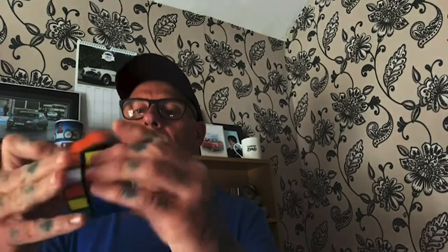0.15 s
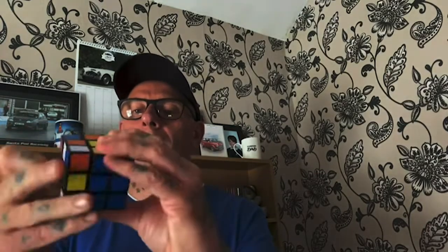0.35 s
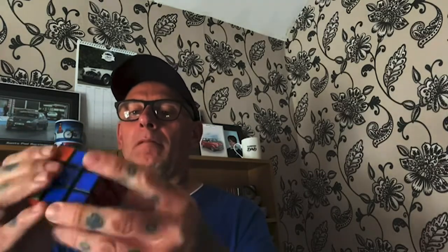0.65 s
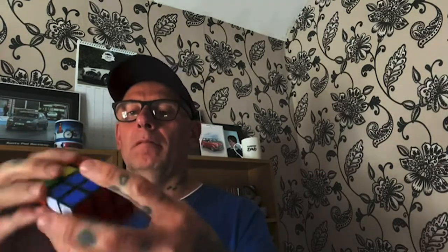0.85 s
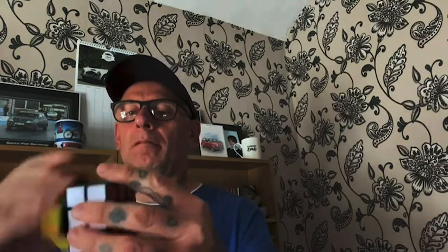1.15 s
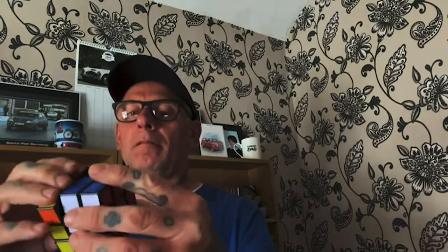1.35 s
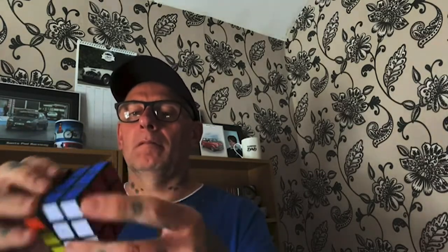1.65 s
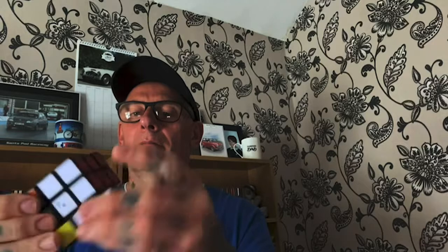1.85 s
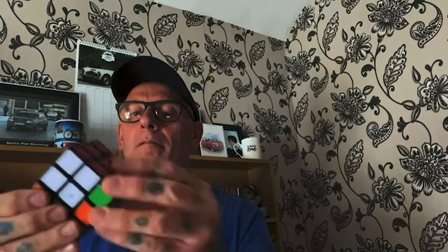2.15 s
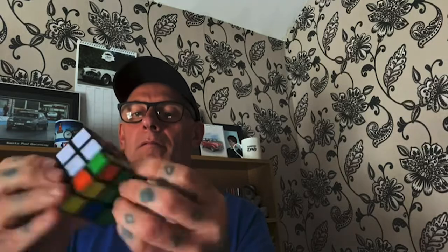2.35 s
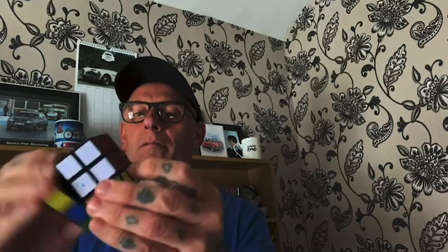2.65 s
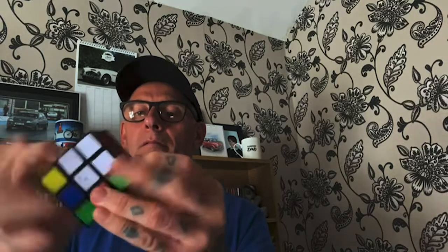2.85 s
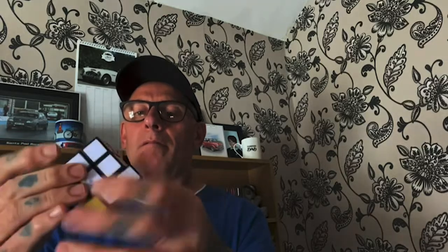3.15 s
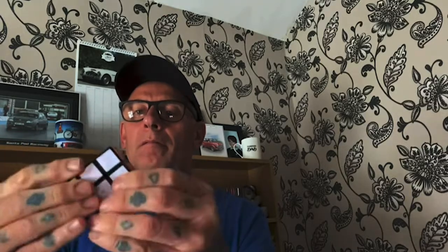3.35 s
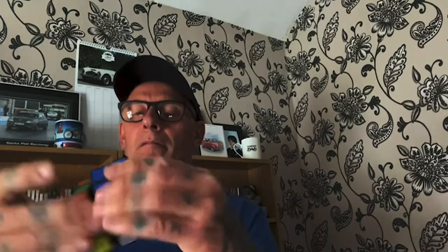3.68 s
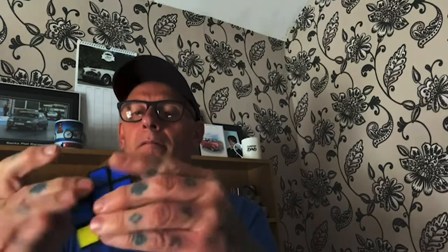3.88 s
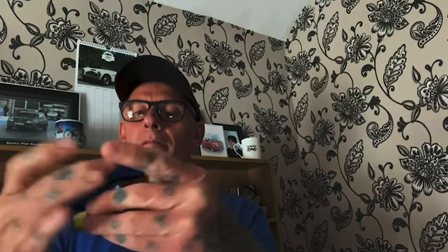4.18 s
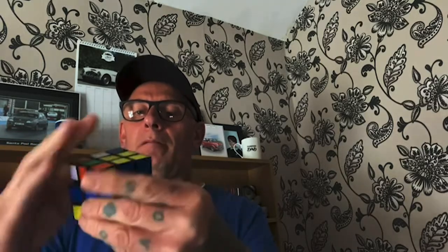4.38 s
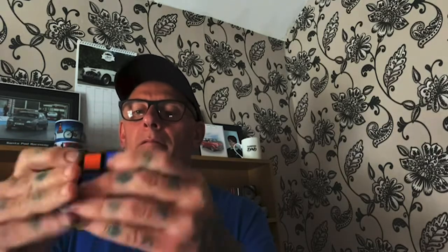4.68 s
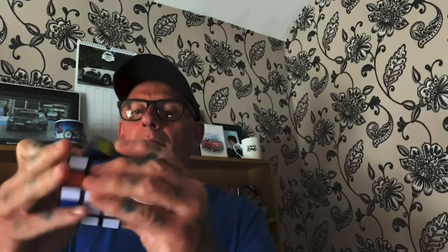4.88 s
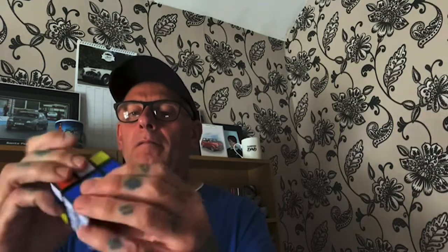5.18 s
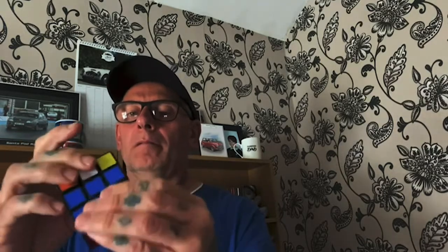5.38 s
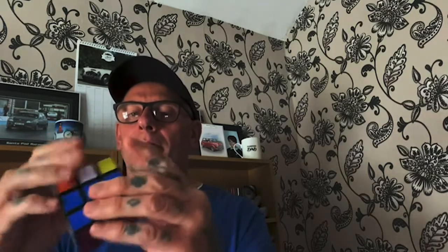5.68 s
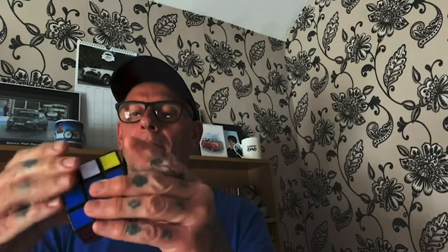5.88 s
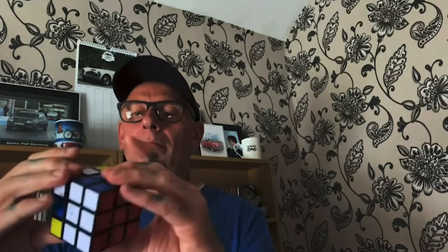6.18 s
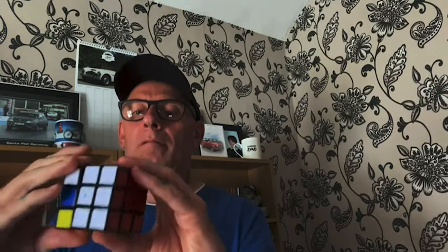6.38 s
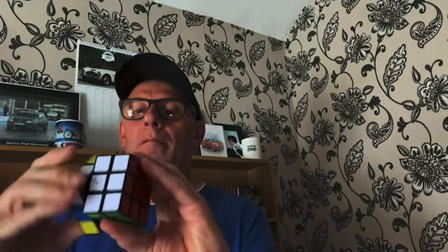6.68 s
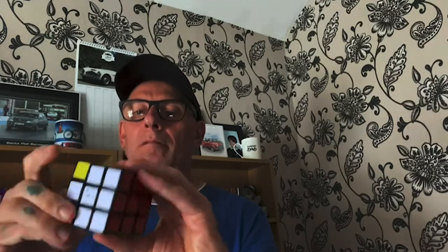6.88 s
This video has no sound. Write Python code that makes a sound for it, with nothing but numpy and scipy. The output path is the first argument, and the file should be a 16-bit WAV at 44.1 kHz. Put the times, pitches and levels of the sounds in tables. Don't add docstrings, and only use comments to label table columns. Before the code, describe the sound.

A hollow plastic puzzle cube is twisted rapidly by hand up close, clattering and clicking in a quiet small room, with late dull thuds.

```python
import sys
import numpy as np
from scipy import signal
from scipy.fft import rfft, irfft, next_fast_len
from scipy.io import wavfile
from scipy.ndimage import uniform_filter1d

SR = 44100
rng = np.random.default_rng(int(sys.argv[2]) if len(sys.argv) > 2 else 0)


def generate_wav(signal):
    frames = np.transpose(np.atleast_2d(signal))
    scaled = np.clip(frames, -1, 1) * 32767
    pcm = np.round(scaled).astype(np.int16)
    wavfile.write(sys.argv[1], SR, pcm)


def gain_from_decibels(decibels):
    exponent = np.asarray(decibels, float) / 20
    return 10 ** exponent


N = 310023
SIZE = next_fast_len(N + SR, True)
HZ = np.fft.rfftfreq(SIZE, 1 / SR)
T_S = np.arange(N) / SR
MID_SIDE = np.array([[1], [-1]])

# start_s, length_s, chatter_db, swish_db (faces rubbing)
TURNS = [(-.06, 0.15, -48, -66.5), (0.033, 0.18, -48.5, -64.5), (0.322, 0.2, -44, -76),
         (0.483, 0.216, -49.5, -80.5), (0.756, 0.225, -52.5, -100), (1.015, 0.248, -43, -64.5),
         (1.194, 0.34, -61.5, -97.5), (1.453, 0.143, -55, -91.5), (1.639, 0.21, -48.5, -64),
         (1.766, 0.28, -46, -65), (2.067, 0.11, -41.5, -71.5), (2.141, 0.33, -60, -70.5),
         (2.365, 0.31, -66, -69.5), (2.523, 0.21, -47.5, -63.5), (2.706, 0.15, -49, -71.5),
         (2.849, 0.26, -50, -63), (3.144, 0.103, -58, -75), (3.33, 0.09, -53.5, -106),
         (3.502, 0.35, -55, -70), (3.877, 0.1, -60, -69), (4.043, 0.25, -56.5, -69),
         (4.337, 0.21, -48.5, -64.5), (4.444, 0.26, -54.5, -66), (4.662, 0.16, -47, -62.5),
         (4.781, 0.22, -48, -68.5), (4.936, 0.31, -54, -77), (5.511, 0.14, -61, -73),
         (6.403, 0.13, -60, -68), (6.499, 0.3, -51.5, -64), (6.941, 0.14, -50.5, -80)]
TURN_PEAK_SHARE = 0.4


def rms_one(x):
    return x / np.sqrt(np.mean(x ** 2) + 1e-20)


def at_hz(points):
    hz, value = np.transpose(points)
    return np.interp(np.log(HZ + 1), np.log(hz), value)


def band(x, low_hz, high_hz):
    return signal.sosfilt(signal.butter(2, [low_hz, high_hz], "band", fs=SR, output="sos"), x)


def resonance(hz, width_hz):
    return 1 / (1 + 1j * (HZ ** 2 - hz ** 2) / (width_hz * HZ + 1e-9))


def at_ports(draws):
    # hz, left_right_likeness (0-1)
    likeness = [(40, .95), (300, .55), (1200, .87), (4000, .8), (6200, .25), (7500, .97), (9000, .88),
                (9900, .99), (11300, .97), (13500, .96), (15000, .93)]
    alike = np.clip(at_hz(likeness), 0, 1)
    common = np.sqrt(0.5 + alike / 2) * draws[0]
    differing = np.sqrt(0.5 - alike / 2) * draws[1]
    return irfft(common + differing * MID_SIDE, SIZE)[:, :N]


def air():
    # hz, density_db (per Hz)
    hiss_spectrum = [(90, 1), (145, -6.5), (215, -4.5), (584, -15), (1320, -22.5), (2500, -25), (5590, -29),
                     (10000, -32.5), (13500, -33.5), (14500, -58)]
    noise = rfft(rng.standard_normal((2, SIZE))) * gain_from_decibels(at_hz(hiss_spectrum)) * (HZ > 85)
    return gain_from_decibels(-77) * rms_one(at_ports(noise))


def rumble():
    # centre_s, spread_s, level_db
    swells = [
        (1.27, 0.04, -67),
        (2.167, 0.051, -76),
        (3.602, 0.02, -65.5),
        (4.19, 0.038, -55),
        (5.199, 0.1, -54),
        (5.7, 0.051, -64),
        (5.87, 0.069, -65.5),
        (6.77, 0.098, -63),
    ]
    mid, side = band(rng.standard_normal((2, N)), 44, 61)
    level = gain_from_decibels(-77)
    for centre_s, spread_s, level_db in swells:
        level = level + gain_from_decibels(level_db) * np.exp(-0.5 * ((T_S - centre_s) / spread_s) ** 2)
    return level * rms_one(mid + 0.18 * side * MID_SIDE)


def thuds():
    # start_s, level_db, centre_hz, t60_s
    hard = [
        (5.687, -42, 202, 0.11),
        (5.735, -57, 236.2, 0.37),
        (6.675, -34, 136, 0.13),
        (6.706, -41.5, 134.5, 0.24),
    ]
    # start_s, level_db, centre_hz, t60_s
    soft = [
        (.385, -65, 105, .2),
        (1.01, -68, 105, .2),
        (2.1, -66, 300, .35),
        (2.85, -63, 170, .15),
        (3.62, -64, 260, .2),
        (4.31, -64, 300, .2),
        (4.95, -64.5, 300, .45),
        (6.35, -68, 520, .3),
    ]
    out = np.zeros((2, N))
    white = rng.standard_normal((2, N)) * [[1], [0.2]]
    for start_s, level_db, hz, t60_s in hard + soft:
        age_s = np.maximum(T_S - start_s, 0)
        for ratio, part_db in [(0.45, 4.5), (1, 4.5), (2.2, -22.5)]:
            mid, side = band(white, 0.77 * ratio * hz, 1.37 * ratio * hz)
            rise = 1 - np.exp(-age_s * ratio / 0.013)
            fall = gain_from_decibels(level_db + part_db - 60 * age_s * ratio ** 0.038 / t60_s)
            out += rise * fall * (mid + side * MID_SIDE) / mid.std()
    for start_s, level_db, hz, t60_s in hard:
        age_s = np.maximum(T_S - start_s, 0)
        rise = 1 - np.exp(-age_s / 0.0041)
        fall = gain_from_decibels(level_db + 4 - 60 * age_s / (0.85 * t60_s))
        out += rise * fall * np.sin(2 * np.pi * hz * age_s)
    return out


def room():
    room_t60_s, treble_t60_s, room_db = 0.14, 0.1, -10.5
    t_s = np.arange(SR // 2) / SR
    white = rng.standard_normal((2, len(t_s))) * (1 - np.exp(-(t_s / 0.0027) ** 2))
    low = signal.lfilter([0.35], [1, -0.65], white)
    tail = low * gain_from_decibels(-60 * t_s / room_t60_s) + (white - low) * gain_from_decibels(-60 * t_s / treble_t60_s)
    return gain_from_decibels(room_db) * rfft(rms_one(tail) / np.sqrt(len(t_s)), SIZE)


def grit(per_s, uneven_db):
    size = gain_from_decibels(uneven_db * np.minimum(rng.exponential(1, N), 3.2)) * (rng.random(N) < per_s / SR)
    return rms_one(size * rng.standard_normal((2, N)))


def turn_speed(start_s, length_s):
    done = np.clip((np.arange(0, N, 44) / SR - start_s[:, None]) / length_s[:, None], 0, 1)
    return np.sin(np.pi * done ** (np.log(0.5) / np.log(TURN_PEAK_SHARE))).clip(0)


def sliding():
    start_s, length_s, chatter_db, swish_db = np.transpose(TURNS)
    speed = turn_speed(start_s, length_s)
    chatter = gain_from_decibels(-83) + gain_from_decibels(chatter_db) @ speed ** 4.2
    swish = gain_from_decibels(-95.5) + gain_from_decibels(swish_db) @ speed ** 4.1
    return [np.interp(np.arange(N), np.arange(0, N, 44), gain) for gain in (chatter, swish)]


def contact_times():
    # start_s, peak_db, hollow_db (rel), edge_db (rel)
    snaps = [(0.0026, -46, 0.5, -7.5), (0.1201, -34.5, 5.5, -1.5), (0.1256, -44, 1, -9),
             (0.1406, -42.5, 16, -8), (0.1473, -36, -4, -1.5), (0.1807, -41, 5, 10), (0.1965, -59, 18, -4),
             (0.3469, -34.5, 0, -12), (0.4125, -41.5, 0, 0.5), (0.4174, -42.5, 5, -9.5),
             (0.5778, -31.5, -4.5, -1.5), (0.6008, -49, 1, 3.5), (0.843, -34, -10, -6.5),
             (0.9981, -36.5, -2.5, -0.5), (1.0884, -44.5, 5, -9.5), (1.1094, -29.5, 4.5, -3),
             (1.1308, -44, 7, -2), (1.1398, -48.5, -4, -4), (1.7005, -41.5, 9.5, 2),
             (1.8168, -44.5, -6, 2.5), (1.8804, -43, -3, -8), (1.8856, -41.5, -7, 0.5),
             (2.2495, -60, -7, 1), (2.2707, -45.5, 7.5, -6), (2.2805, -34, 3.5, -6),
             (2.3498, -24, 1.5, 3.5), (2.354, -34, 0.5, -3.5), (2.3772, -52, -3, -4.5),
             (2.596, -41, 4, -0.5), (2.6072, -44, -16, -4), (2.7753, -36, -11, -7),
             (2.8464, -28, -8.5, -5.5), (2.9252, -26.5, -7, -1.5), (3.1759, -64.0, -1, 11),
             (3.6563, -38, 4, -2), (3.6686, -27, -3, -10), (4.151, -53, 7.5, -12.5),
             (4.3977, -33, -4.5, -1.5), (4.4044, -41.5, -13, 0), (4.4214, -41, -3, -5.5),
             (4.6768, -36.0, 2, -4.5), (4.6825, -50, -6, -1), (4.8516, -53, 18, 7.5),
             (5.0292, -40.5, -9.5, -5.5), (5.3313, -40, -14.5, -7), (5.5276, -43.5, 6.5, 12.5),
             (5.5321, -34, 0.5, -3.5), (6.4308, -45.5, -6, 1), (6.4363, -56, -4.5, 4),
             (6.977, -36, 5, -0.5)]
    # start_s, peak_db, hollow_db (rel), edge_db (rel)
    clacks = [(0.0176, -53.5, 8.5, -17), (0.0675, -30.5, -9, -12), (0.1069, -37.5, 11, 1),
              (0.1106, -23, -16, -5), (0.1366, -38, 8, -9), (0.3788, -26.5, -5.5, -11.5),
              (0.6577, -38.0, -2.5, -8), (0.8223, -46, 0, -18.5), (0.8717, -45, -3.5, -7),
              (0.8884, -38.5, -7, -12), (1.0081, -38.5, 2.5, -2), (1.0949, -32, -3, -10.5),
              (1.1196, -28, -5, -15), (1.2875, -43.5, 2.5, -5.5), (1.7133, -34.5, 2.5, -6.5),
              (1.7235, -41.5, 11.5, -2), (1.8465, -44.5, -20, -4), (2.0931, -45, 8, -6),
              (2.1123, -52, 8, -16.5), (2.2428, -42, 2.5, -2), (2.2909, -38.5, -8, -18),
              (2.4573, -30.5, 0.5, -7), (2.8143, -45.5, 0, -10.5), (2.8534, -46, 4, -7.5),
              (2.8903, -36.5, 1, -9.5), (2.9325, -26, 2.5, -11.5), (2.9395, -35.5, 0, -10),
              (2.9522, -61, -1, -11.5), (2.9682, -27.5, 0.5, -7), (2.9761, -43, 12.5, -1),
              (2.9926, -43.5, -16, -12), (3.6648, -36, 6.5, 0.5), (4.1627, -54.5, 15.5, -2.5),
              (4.1687, -54, 10.5, -7.5), (4.3804, -32.5, 0, -6.5), (4.5196, -45.5, 0.5, -17),
              (4.5625, -42.5, 5, -12.5), (4.586, -79, 32, -14.5), (4.5915, -38, 5, -4),
              (4.6628, -51.5, 4.5, -15), (4.7084, -30.5, 4, -10), (4.7139, -43.5, -11, -11),
              (4.7471, -48.5, 8, -9.5), (4.9918, -43, -7.5, -14.5), (5.1295, -46, -1.5, -7),
              (6.5455, -50.5, 8.5, -1.5), (6.571, -46, 1, -8), (6.5887, -37.5, 7, -19),
              (6.6398, -55, 15.5, -10)]
    # start_s, peak_db, hollow_db (rel), edge_db (rel)
    knocks = [(0.2663, -44, 10.5, -14), (0.279, -37, 2, -18.5), (0.3192, -34.5, -4.5, -25.5),
              (0.5332, -36, -1.5, -11), (0.5826, -32, -4.5, -28), (0.8305, -42.5, -9, -26),
              (1.0745, -52, 4, -21.5), (1.0787, -52.5, 13.5, -20.5), (1.1543, -53.5, -13, -12),
              (1.4935, -42, -0.5, -18), (1.5157, -40, -11, -14), (1.8504, -33.5, 2, -23),
              (1.8704, -32.5, -12, -10.5), (1.8741, -42, 13.5, -19), (2.0545, -47, 4, -28),
              (2.1258, -45, 6.5, -10.5), (2.1483, -38.5, -4.5, -18.5), (2.2308, -54.5, 14.5, -6),
              (2.7464, -48.5, 2, -19.5), (2.7681, -39, -23, -14.5), (2.8075, -35.5, -12, -23),
              (2.8185, -52, 9, -19), (2.8606, -31.5, -1, -16.5), (2.8796, -34.5, -15, -8.5),
              (2.9016, -40.5, -6, -26.5), (3.1869, -46.5, -2, -14), (3.4887, -39, 3, -21),
              (3.579, -45, 1.5, -25.5), (3.6496, -35.5, 4, -14), (3.7194, -41, 1.5, -10),
              (4.023, -40.5, 2.5, -45), (4.1283, -48.5, 9, -23.5), (4.134, -54, 0, -17.0),
              (4.1555, -48.5, 9.5, -21.5), (4.5748, -42, 8.5, -18), (4.5812, -33, -1.5, -29.5),
              (4.6436, -40.5, -9, -14), (4.7202, -50, 15.5, -13), (4.7518, -46.5, 4, -8.5),
              (4.8357, -41, -5.5, -10.5), (4.8466, -41, 2, -23.5), (4.9018, -46, 7, -20.5),
              (5.025, -53, 16, -19), (5.1043, -54, 15, -13), (5.5453, -45, -1, -19),
              (6.6231, -38.5, -7, -11.5), (6.6283, -40, 5.5, -15.5)]
    # start_s, peak_db, hollow_db (rel)
    ticks = [(0.2331, -53, 3), (0.5122, -58.5, 2), (0.8627, -71, 15), (1.2473, -60.5, 7), (1.4573, -66, 5),
             (1.5683, -67, 9.5), (1.6661, -59.5, 7), (1.7968, -63.5, 14.5), (1.8238, -50.5, 14),
             (1.9627, -53.5, -13), (1.9684, -58, -13), (2.0031, -52.0, 4), (2.4179, -60, 12),
             (2.5336, -56, -8), (2.5775, -51, -15), (2.9998, -52.5, -6), (3.0046, -51, -22),
             (3.0315, -64, 12.5), (3.5129, -71, 12), (3.5239, -62.5, -1), (3.8926, -50.5, -3),
             (3.9227, -67, 10), (4.1006, -72, 13), (4.5361, -54.5, 9), (4.8676, -58, -5), (4.8788, -68, 11),
             (4.9287, -63.5, 9), (5.0454, -72, 27), (5.142, -59.5, 9), (5.246, -66, -3.5),
             (5.3378, -68.5, 22), (5.4468, -56.5, 0), (5.5655, -58.5, -15), (5.8451, -83.5, 23),
             (6.2467, -77.5, 20.5), (6.6904, -49, 2), (6.9252, -65, -11.5)]
    # start_s, peak_db, hollow_db (rel)
    nudges = [(0.0346, -43, -4.5), (0.285, -50.5, 3), (0.6374, -58, 10), (0.6639, -66, 17),
              (0.6804, -59, 5), (0.708, -68.5, 9), (0.7547, -79.5, 21), (0.8981, -50.5, -4),
              (0.9872, -60.5, 2), (1.3618, -45.5, -2), (1.4528, -81.5, 26), (1.6965, -43.5, -5),
              (1.7035, -42.5, -2), (1.7484, -58, 3.0), (1.7534, -46, 4), (1.7604, -50, -10),
              (1.9253, -58, 4.5), (2.0365, -53.5, 3.5), (2.1425, -51, -10), (2.3445, -49.5, -2),
              (2.4117, -52.5, -4), (2.5708, -58, 2.5), (2.6431, -54, -2), (2.9165, -44.5, 2.5),
              (2.9217, -34, -1.5), (3.3655, -52.5, 6.5), (3.6311, -50, 2), (3.8459, -60.5, 3),
              (3.8828, -68.5, 13.5), (3.9135, -51.5, -0.5), (4.046, -62.5, 7), (4.2959, -78, 24.5),
              (4.4535, -51, 3), (4.462, -58.5, 6.5), (4.5289, -51.5, -4), (4.6346, -47, 2.5),
              (4.7678, -51.5, 4), (4.8249, -61.5, 16.5), (4.8945, -47.5, 5), (5.0774, -64, -3),
              (5.3253, -59.5, 13.5), (5.3687, -64, 2), (5.4311, -56.5, 7), (5.4348, -53.5, -1),
              (5.5929, -52.5, 1.5), (5.9835, -79, 25.5), (6.0299, -49.5, -3), (6.1295, -74.5, 15.5),
              (6.2694, -79.5, 14.5), (6.9316, -69, 16.5), (6.996, -53.5, 19.5)]
    # start_s, peak_db, hollow_db (rel)
    taps = [(0.2578, -45.5, -5), (0.5574, -59, -2), (0.7714, -63, 9), (0.7953, -59, 8.5), (0.8041, -67, 14),
            (0.8387, -49, -10), (1.2189, -56, -1), (1.2301, -49.5, 1), (1.2436, -52.5, 2),
            (1.5736, -59, 2.5), (1.9345, -46, 2.5), (2.0408, -47.5, 5.5), (2.1842, -55, -6),
            (2.2762, -53.5, -14), (2.5122, -48, -8), (2.7427, -56, 10.5), (2.7641, -57.5, 13.5),
            (3.0759, -71.5, 11), (3.3498, -69.5, 10.5), (3.4067, -62.5, 8), (3.4224, -57, 9.5),
            (3.4526, -72, 18.5), (3.4822, -53.5, -2.5), (3.5423, -59.5, -4.5), (3.5543, -57.5, 7),
            (3.8634, -63.5, 6), (4.0295, -76, 6.5), (4.0704, -58, 10.5), (4.0744, -77.5, 11),
            (4.3099, -78, 26.5), (4.3143, -60, 8), (4.6501, -55, 5.5), (5.2412, -72, 11.5),
            (5.2679, -62.5, 7.5), (5.439, -54, 4), (5.4934, -66, 17.5), (5.4972, -48, -8),
            (5.5039, -60.5, 14.5), (5.6284, -59.5, 8), (5.6583, -67, 11), (5.6852, -60.5, 3.5),
            (5.7471, -61, 2), (5.8097, -70, 10.5), (6.01, -67, 18.5), (6.554, -48, 2.5)]
    rows = list(snaps) + list(clacks) + list(knocks)
    for light, edge_db in [(ticks, -4.5), (nudges, -15), (taps, -26.5)]:
        rows += [(*row, edge_db) for row in light]
    return np.transpose(rows)


def contact(start_s, peak_db, fast_s, rough, rattle_s, rattle_db):
    clicks = np.zeros(N)
    np.add.at(clicks, (start_s * SR).astype(int), gain_from_decibels(peak_db))
    fast, slow, lead = np.exp(-1 / (np.array([fast_s, rattle_s, 0.002]) * SR))
    pulse = signal.lfilter([np.e * (1 - fast)], [1, -2 * fast, fast ** 2], clicks + 1e-18)
    skirt = pulse * rng.standard_normal((2, N))
    clean = clicks * np.e / 2 * np.sqrt(fast_s * SR) * rng.choice([-1, 1], N)
    blow = np.array([np.sqrt(1 - np.clip(rough, 0, 1) ** 2) * clean + rough * skirt[0], skirt[1]])
    rattle = gain_from_decibels(rattle_db) * signal.lfilter([1], [1, -slow], clicks + 1e-18)
    scrape = gain_from_decibels(-16.5) * signal.lfilter([1], [1, -lead], clicks[::-1] + 1e-18)[::-1]
    return blow + (rattle + scrape) * grit(per_s=4400, uneven_db=-0.5)


def body(modes, forces, splits_hz=()):
    tops = [(-1) ** k * gain_from_decibels(db) * resonance(hz, width_hz) for k, (hz, db, width_hz) in enumerate(modes)]
    group = np.searchsorted(splits_hz, [hz for hz, db, width_hz in modes])
    rung = 0
    for k, force in enumerate(forces):
        rung = rung + sum(top for top, g in zip(tops, group) if g == k) * rfft(force, SIZE)
    return rung / np.sqrt(np.mean(np.abs(sum(tops)) ** 2))


def gripped(modes, forces, splits_hz, shift, change_db):
    grip = np.repeat(rng.integers(0, 4, N // 300 + 1), 300)[:N]
    phase_rad = rng.uniform(0, 2 * np.pi, (len(modes), 2))
    out = 0
    for way in range(4):
        change = np.sqrt(2) * np.sin(phase_rad + np.pi / 4 + np.pi * way / 2) * [shift, change_db]
        held = [(hz * (1 + up), db + more_db, width_hz)
                for (hz, db, width_hz), (up, more_db) in zip(modes, change)]
        gate = uniform_filter1d((grip == way) * 1.0, size=60)
        out = out + body(held, forces * gate, splits_hz)
    return out / (1 + 1j * HZ / (2.17 * modes[-1][0])) ** 4


def wrapped(force):
    # deep_air_mode_db, upper_shell_modes_db
    wraps = [(9, 7.5), (-4.5, 1), (5, 1), (2.5, 0.5), (6, 4), (4, -4), (-2.5, 0), (5.5, 0), (-3, -1),
             (0.5, 1.5), (3.5, -2), (-2, -12.5), (-8.5, -1), (7, 5.5), (4, 2.5), (-3, 0), (-6.5, 5.0),
             (1.5, -4.5), (0, 2), (5, 1), (4, 5), (0.5, 0.5), (-3, -2), (4.5, 0), (1.5, 2), (-5.5, -0.5),
             (0, -0.5), (-0.5, -4.5), (-3, -4.5), (-7, -13.5)]
    start_s, length_s = np.transpose(TURNS)[:2]
    peak_s = start_s + TURN_PEAK_SHARE * length_s
    deep, upper = [gain_from_decibels(np.interp(T_S, peak_s, db)) for db in np.transpose(wraps)]
    return [force * deep, force, force * upper]


def cube():
    # hz, level_db, width_hz
    hollow_modes = [(453, -35.5, 540), (720, -13.5, 91), (1157, -6.5, 236), (1221.3, -1.5, 243),
                    (1394, -7, 140), (1590, -12, 410)]
    # hz, level_db, width_hz
    piece_modes = [(2205, 1.5, 480), (2520, 6, 595), (3257, 2, 770), (4186, -0.5, 1200),
                   (5230, -10.5, 4100)]
    # hz, level_db, width_hz
    edge_modes = [(5086, -1, 4780), (7910, 2.5, 2390), (9700, -2, 2000), (12400, -6, 2900),
                  (15300, -8.5, 1300)]
    start_s, peak_db, hollow_db, edge_db = contact_times()
    chatter, faces = sliding()
    rub = chatter * grit(per_s=2300, uneven_db=6)
    swish = faces * grit(per_s=4200, uneven_db=6)

    on_hollow = contact(start_s, peak_db + hollow_db + 1.5, fast_s=0.0008, rough=0.21,
                        rattle_s=0.0076, rattle_db=-10.5) + gain_from_decibels(-7.5) * rub
    on_pieces = contact(start_s, peak_db, fast_s=0.00058, rough=0.73,
                        rattle_s=0.0066, rattle_db=-13) + gain_from_decibels(-13) * rub
    on_edges = contact(start_s, peak_db + edge_db, fast_s=0.00034, rough=0.87,
                       rattle_s=0.017, rattle_db=-26) + swish

    order = np.argsort(start_s)
    thin = gain_from_decibels(3 + 0.33 * np.interp(T_S, start_s[order], edge_db[order]))
    out = gripped(hollow_modes, wrapped(on_hollow), [900, 1300], shift=0.045, change_db=3.5)
    out = out + gripped(piece_modes, [on_pieces, thin * on_pieces], [3700], shift=0.03, change_db=0)
    out = out + body(edge_modes, [on_edges])
    dip = 1 - 0.5 * resonance(812, 110)
    return out * dip * (1j * HZ / (250 + 1j * HZ)) ** 2


def scene():
    near = cube()
    heard = near + near[0] * room() * np.array([[1], [gain_from_decibels(7.5)]])
    return at_ports(heard) + thuds() + rumble() + air()


def top_cut(x):
    return signal.sosfilt(signal.butter(12, 16490, fs=SR, output="sos"), x)


def record(dry):
    # hz, left_lead_rad
    port_lead = [(0, 0), (1300, .1), (4300, 1.1), (5600, 2.8), (6600, 4.9), (8700, 6.8), (9900, 8.6),
                 (10250, 9.2), (10950, 9.8), (12000, 11.5), (14300, 14.1), (15100, 15.4), (17000, 15.8)]
    # hz, left_minus_right_db
    port_balance = [(60, .7), (180, -.2), (550, 3.2), (1650, 1), (4970, -1.2), (15000, -.8)]
    lead_rad = np.interp(HZ, *np.transpose(port_lead))
    half_db = at_hz(port_balance) / 2
    ports = np.array([gain_from_decibels(half_db), gain_from_decibels(-half_db) * np.exp(-1j * lead_rad)])
    limit = (HZ < 16500) / (1 + (HZ / 16050) ** 40)
    mix = irfft(rfft(dry, SIZE) * ports * limit, SIZE)[:, :N]
    return top_cut(mix)


dry = scene()
out = record(dry)
generate_wav(out)
```